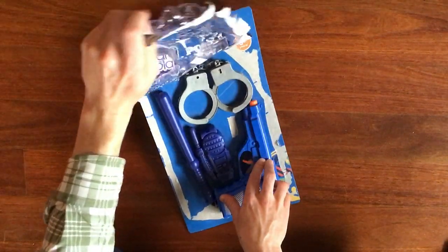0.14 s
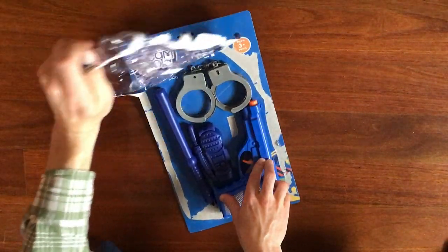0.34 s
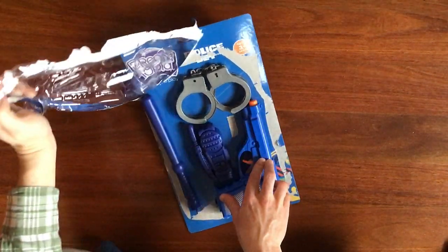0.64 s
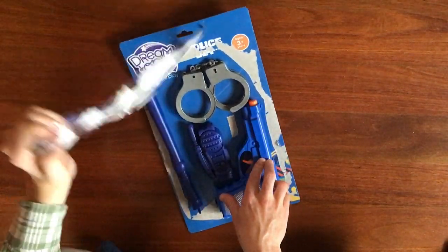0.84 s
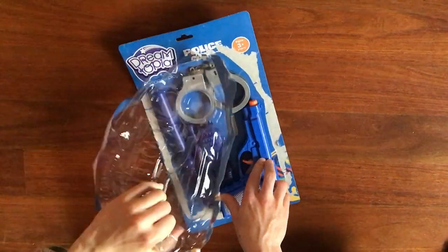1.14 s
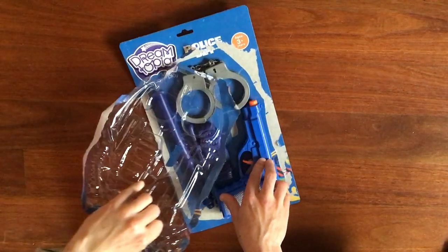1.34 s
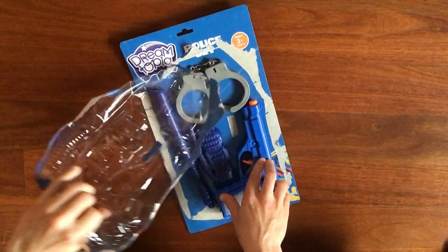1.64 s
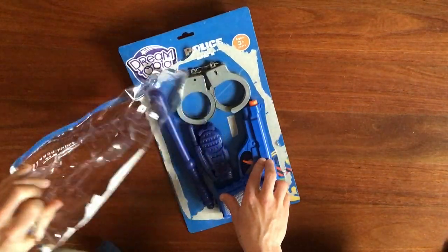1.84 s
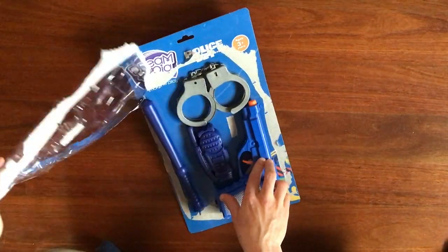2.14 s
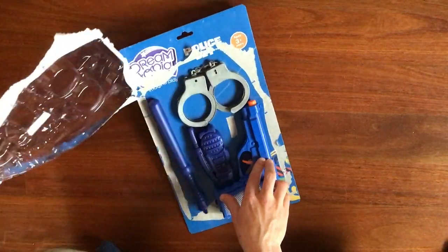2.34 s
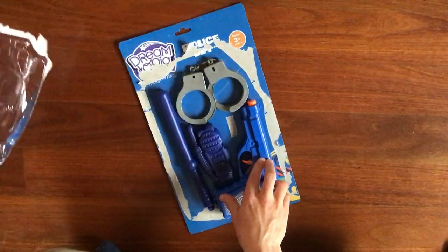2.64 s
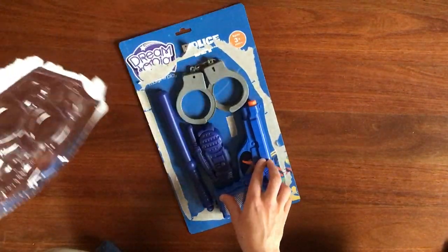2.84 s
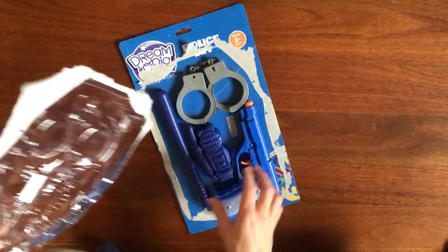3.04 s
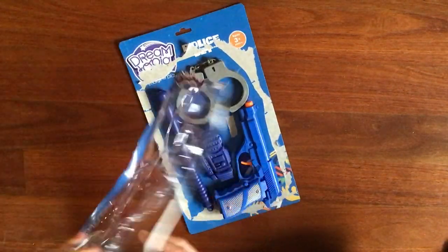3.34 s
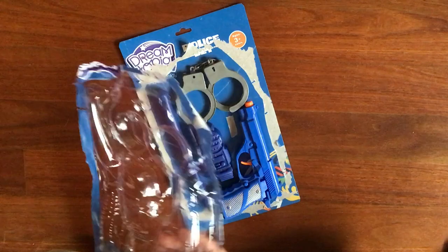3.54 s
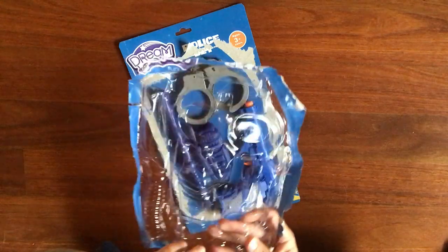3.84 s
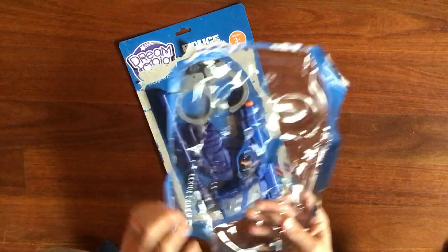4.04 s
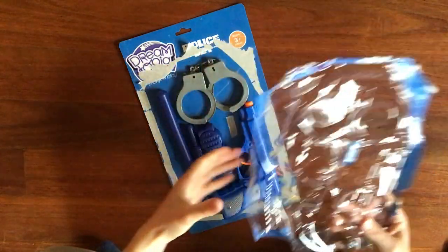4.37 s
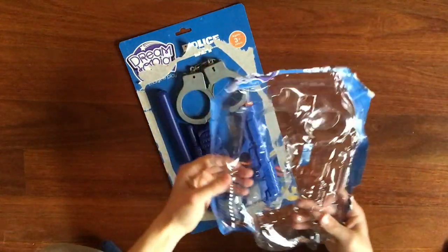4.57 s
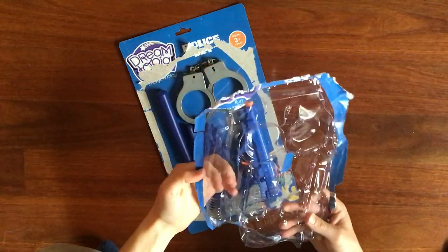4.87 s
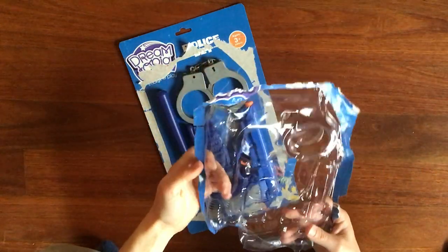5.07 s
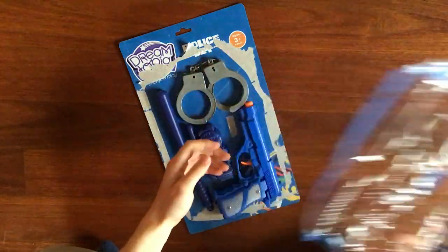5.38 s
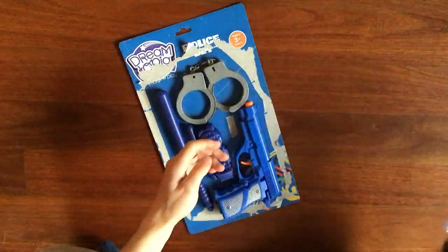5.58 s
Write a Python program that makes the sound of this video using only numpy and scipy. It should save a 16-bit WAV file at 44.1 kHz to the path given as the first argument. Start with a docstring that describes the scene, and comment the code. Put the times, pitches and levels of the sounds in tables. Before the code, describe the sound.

Stiff clear plastic packaging is torn from cardboard and turned in the hands, with sharp irregular snaps and crackling in a small room.

```python
"""A stiff clear plastic shell is torn off its cardboard backing on a wooden floor, then turned over in the hands.
Its dents buckle with sharp snaps, glued paper fibres tear in between; a small room answers, loud snaps overload the microphone."""
import sys
import numpy as np
from scipy import signal
from scipy.fft import rfft, irfft
from scipy.io import wavfile

SR = 44100
rng = np.random.default_rng(int(sys.argv[2]) if len(sys.argv) > 2 else 0)


def store_pcm(level_fs):
    """Save levels as 16-bit WAV."""
    pcm = np.round(np.clip(level_fs, -1, 1) * 32767).astype(np.int16)
    wavfile.write(sys.argv[1], SR, np.atleast_2d(pcm).T)


N = 251811

# buckling snaps: (s, snap dB, panel pitch Hz, half width in octaves, shell boom dB, bright crack dB)
SNAPS = [(.0043, -6, 4050, 0.61, -26, -24), (.0762, -20, 3100, 0.97, -25, -35), (.1508, -29.5, 3070, 0.59, -34.5, -37.5), (.2012, -28, 4100, 0.46, -49, -43),
         (.2335, -36.5, 2100, 1.2, -30.5, -58), (.3939, -28.5, 3030, 1.3, -34.5, -57), (.4207, -28, 3800, 1.4, -44.5, -55), (.4663, -23, 1760, 0.85, -24.5, -45),
         (.5443, -11.5, 4100, 0.34, -25.5, -16), (.6462, -13, 4700, 0.44, -30.5, -29), (.7025, -18.5, 2870, 0.92, -30, -53.5), (.7315, -12.5, 5600, 0.5, -55, -27),
         (.7866, -18.5, 3380, 0.68, -31, -43), (.821, -13, 3480, 1.13, -56.5, -30), (.8407, -10, 5100, 0.47, -24, -25), (.862, -18, 1680, 0.44, -38.5, -28),
         (.9128, -16.5, 2480, 2, -33, -41), (.9805, -8, 2420, 0.73, -31.5, -30), (1.0862, -7.5, 2630, 1, -18, -21), (1.1171, -15.5, 3420, 0.88, -35.5, -26.5),
         (1.1862, -18.5, 2220, 0.79, -30.5, -50), (1.2067, -5, 4000, 0.87, -14, -22), (1.2623, -7, 4070, 1.27, -15, -15),
         (1.2872, -19, 2780, 1.2, -19.5, -26), (1.3103, -8.5, 4500, 0.4, -32.5, -20), (1.321, -2, 2620, 1.38, -13.5, -21), (1.3323, -13, 2470, 2.9, -29.5, -32),
         (1.5792, -18, 1950, 0.54, -22, -76.5), (1.697, -13, 2350, 1.06, -22.5, -43), (1.7069, -15.5, 1940, 0.48, -38.5, -46.5),
         (1.7188, -17, 4200, .8, -40.5, -28), (1.7549, -16.5, 3880, 0.93, -31, -42), (1.785, -13, 2560, 1.4, -23, -27.5), (1.8068, -16.5, 2010, 0.84, -32, -34), (1.8421, -14, 4200, 0.88, -25.5, -30),
         (1.8627, -5, 3300, 1.14, -20.5, -19), (1.8727, -10.5, 3740, 0.98, -25.5, -41), (1.9223, -10, 2900, 1.1, -28, -45), (1.9521, -13.5, 2730, 0.54, -66, -68),
         (2.0332, -20, 4430, 1.1, -58.5, -47), (2.0452, -14.5, 3400, 0.74, -35.5, -24), (2.0855, -17.5, 3570, 0.85, -24, -47),
         (2.1749, -8, 3480, 0.87, -22, -37), (2.2627, -15.5, 3030, 0.49, -30.5, -34), (2.3347, -15, 2950, 1.4, -55.5, -30), (2.468, -24.5, 2500, 0.79, -31.5, -28),
         (2.4836, -9.5, 3020, 0.9, -26, -35), (2.5223, -16.5, 2630, 0.59, -30.5, -25.5), (2.7704, -23.5, 3830, 0.74, -44, -55), (2.7796, -12.5, 3940, 0.86, -30, -20.5),
         (2.9042, -37, 2340, 0.41, -46, -65), (3.0208, -20, 2040, 0.45, -35, -50), (3.0825, -34, 2280, 0.85, -35, -58), (3.1081, -13, 2920, 1.01, -57, -32.5),
         (3.1974, -25, 3650, 1, -43, -27.5), (3.2561, -32, 2330, 0.35, -40.5, -62), (3.3761, -21.5, 3280, 0.91, -43, -39.5), (3.4297, -27.5, 2220, 1.3, -33, -40.5),
         (3.4361, -16, 2750, 1.3, -27.5, -32), (3.4427, -11, 2680, 0.84, -39, -19), (3.4488, -12.5, 3100, 1.2, -22, -44.5), (3.4743, -12.5, 3070, 0.98, -24, -28),
         (3.4817, -22, 4460, 1.4, -46, -20), (3.4905, -12, 2750, 1.1, -43, -24), (3.495, -10, 2950, 1.3, -25.5, -34), (3.5618, -20, 3340, 1.2, -38.5, -37), (3.5683, -13.5, 3040, 1.1, -27, -20), (3.6872, -12, 3730, 1, -29.5, -18),
         (3.7319, -8, 3400, 1.16, -26.5, -19), (3.8313, -22.5, 3040, 1.3, -34, -47), (3.8411, -12, 5100, 0.59, -51, -23), (3.856, -24, 1900, 0.76, -47, -55), (3.8825, -15.5, 2240, 0.97, -31, -30),
         (3.9413, -22.5, 2220, 0.91, -28, -47), (4.029, -27, 3800, 0.31, -35.5, -67), (4.0556, -17, 3270, 1.33, -22.5, -21.5), (4.0984, -25.5, 3650, 1.4, -31.5, -54),
         (4.1314, -21, 2380, 1.7, -31.5, -52), (4.1463, -22, 3730, 0.98, -38.5, -34), (4.2571, -21, 2380, 0.83, -32.5, -51), (4.4133, -8.5, 2780, 1.32, -25.5, -20),
         (4.5424, -24, 2140, 1.1, -25.5, -44), (4.55, -15.5, 2800, 0.64, -31, -29), (4.5709, -13.5, 3100, 1.08, -26, -28),
         (4.6243, -22.5, 3200, 0.38, -41.5, -37), (4.6402, -5.5, 2500, 1.07, -21.5, -17), (4.7167, -10, 2460, 1.16, -37, -25), (4.721, -11.5, 2980, 0.8, -18, -19.5),
         (4.7375, -8.5, 3200, 0.74, -25, -18), (4.7701, -11.5, 2640, 1.03, -24.5, -35.5), (4.7785, -12, 3620, 1.4, -40.5, -21), (4.8006, -6.5, 3340, 1.15, -46.5, -12),
         (4.8812, -5, 2480, 0.68, -17, -17), (4.9444, -14, 3560, 1.06, -30.5, -28), (4.9739, -12.5, 2160, 1.14, -38, -29),
         (5.0553, -29, 2290, 1.4, -27.5, -59), (5.0883, -18.5, 4180, 0.51, -34, -28), (5.106, -8, 3400, 1.23, -22, -17), (5.2722, -30.5, 1470, 0.34, -59, -71),
         (5.2936, -21, 2730, 0.46, -29, -58), (5.4205, -31, 2530, 0.33, -43, -76)]
# tearing and flexing: (s, crackle dB, creak dB of the deep modes, of the middle modes, of the upper modes)
STRAIN = [(0.0, -17, -55.5, -37, -48.5), (0.219, -53.5, -64, -48, -62), (0.55, -25, -33, -49, -39), (.71, -46, -69, -47.5, -56), (.92, -36.5, -58.5, -52, -53.5), (1.21, -49.5, -37.5, -33, -43.5),
          (1.28, -18, -47.5, -45, -37), (1.42, -41.5, -53.5, -46, -56.5), (1.64, -59, -59, -38, -50.5), (1.84, -33, -31.5, -44, -41), (2.0, -39, -57.5, -67, -54), (2.19, -30.5, -41.5, -44, -43), (2.4, -34, -48, -41, -42),
          (2.7, -64, -59.5, -48, -68), (3.3, -74.5, -81, -61.5, -70), (3.45, -31.5, -35.5, -57, -64), (3.62, -41.5, -51.5, -62, -45), (4.011, -40, -41.5, -57, -50), (4.2, -61, -45.5, -73, -67.5), (4.4, -54, -87, -60, -74.5),
          (4.63, -51, -44, -27, -43), (4.76, -32, -36.5, -42, -38.5), (4.96, -44.5, -37, -24, -37.5), (5.15, -53, -62.5, -46.5, -45), (5.31, -78, -68.5, -36.5, -81.5), (5.71, -75, -64, -72, -73)]
RASP_DB = -6   # low rasp beside the deep creak
# bright fizz of the glue line peeling off the card: (s, dB)
PEEL = [(0., -46), (.3, -59), (.52, -43.5), (.75, -48), (1.3, -45.5), (1.55, -72), (1.75, -46), (2.14, -62.5), (2.28, -42.5), (2.48, -44), (2.62, -84)]
# held free in the air, the shell hums on in its second mode: (s, dB)
HOLLOW = [(3.4, -87), (3.5, -44), (4.17, -44.5), (4.32, -80)]
SHELL = [(205, -7, 0.075), (268.4, -8, 0.15), (320, -5.5, 0.12), (372, -4.5, 0.15), (643, -8.5, 0.11), (1128, -1, 0.056), (1226, -1.5, 0.069), (1446, -3.5, 0.11)]   # whole-shell modes: (Hz, dB, t60 s)
FIBRES = [(400, -33.5), (900, 12.5), (2000, 16), (5500, 15), (8000, 8.5), (16000, -6.5)]   # crackle colour: (Hz, dB per Hz)
HUSH, HUSH_DB = [(35, -46.5), (85, -15), (193, 4.5), (780, -5.5), (2410, -11), (16000, -33)], -55   # room tone: (Hz, dB per Hz)
ROOM_T60 = [(200, 0.33), (3000, 0.27), (7000, 0.26), (15000, 0.33)]   # (Hz, s)
ECHOES = [(.0038, -25)]   # off the floor: (delay s, dB)
CUTOFF_HZ = 16500   # fixed
SNAP_T60_S, CRACK_T60_S, THUD_T60_S = 0.011, 0.0097, 0.038
# thin creases ticking, all crack and no body: (s, dB)
TICKS = [(.9086, -25), (0.966, -28), (1.0394, -25), (1.0976, -21), (1.137, -16.5), (1.7966, -29),
         (1.943, -13.5), (2.417, -43), (2.668, -48), (3.5396, -21), (3.578, -26), (3.6546, -25)]
# the panel rings on at its pitch, less so the wider the snap
PANEL_DB, PANEL_LOSS_DB_PER_OCTAVE, PANEL_T60_S = 5, 5.5, 0.0068
# dull knocks of the card and the flexing shell: (s, peak dB, pitch Hz)
KNOCKS = [(0.375, -28.5, 293), (0.491, -23, 287), (1.087, -20.5, 314), (1.209, -9, 300), (1.582, -23.5, 264), (1.696, -25.5, 254),
          (1.863, -13, 394), (2.063, -19.5, 350), (2.18, -16.5, 257), (3.452, -16, 280), (3.688, -20.5, 360),
          (3.73, -18.5, 370), (3.883, -16, 372), (4.049, -20, 377), (4.412, -20.5, 365)]
KNOCK_T60_S, KNOCK_RISE_S = 0.063, 0.00063
# a dent flips in a sharp spike, flips once more a moment later, and leaves a weaker rattle
FLIP_T60_S, REFLIP_S, REFLIP_DB, RATTLE_DB = 0.0022, (0.002, 0.0042), -1, -3.5
AFTERSHOCKS = 8   # fixed
AFTER_DB, AFTER_T60_S = -6.5, 0.059   # smaller creases follow each flip, ever weaker
# small flat panels that ring on clearly after a snap: (s, peak dB, pitch Hz, t60 s)
PINGS = [(0.6465, -3, 5000, 0.014), (0.7307, -3, 3920, 0.015), (.9805, -10.5, 2250, 0.035), (3.1089, -9, 2920, 0.026), (3.842, -15.5, 3310, .05), (3.8825, -9, 1540, 0.027), (4.148, -25, 3480, .09), (4.8001, -7.5, 1830, 0.037)]
SLOWER_PER_DB = 0.38   # weak buckles give way gradually: rise time grows by this many dB for each dB under the strongest
MODE_SCATTER_DB = 4   # fixed


def amp(db):
    return 10 ** (np.asarray(db) / 20)


def rms_one(x):
    return x / np.sqrt(np.mean(x ** 2) + 1e-20)


def at_hz(points, hz):
    """A spectrum read on a log-frequency axis."""
    return np.interp(np.log(hz + 1), np.log(np.array(points)[:, 0]), np.array(points)[:, 1])


def curve(rows):
    """Gain over time from (s, dB) points."""
    return amp(np.interp(np.arange(N) / SR, *np.transpose(rows)))


def coloured(x, points):
    """A signal given a spectrum; rms 1."""
    return rms_one(irfft(rfft(x) * amp(at_hz(points, np.fft.rfftfreq(len(x), 1 / SR))), len(x)))


def ring(x, hz, t60):
    """A unit click sets a sine of height 1 ringing."""
    r, w = amp(-60 / (t60 * SR)), 2 * np.pi * hz / SR
    return signal.lfilter([0, np.sin(w)], [1, -2 * r * np.cos(w), r * r], x + 1e-18)


def snaps(near_db=(0., 1.5), spread_db=(-5., -8.), lumps=0.46, boom_db=-7.5, thud_db=0.0, rise_s=0.00019, count=4):
    """Each buckle is a dry burst around its panel's pitch with a bright crack, and a push on the whole shell.
    Returns what is heard straight, what spreads into the room from each of a few spots on the sheet, and the boom."""
    size = 2048
    near, spread, push = np.zeros(N + size), np.zeros((count, N + size)), np.zeros((len(SHELL), N))
    t = np.arange(size) / SR
    for k, (s, snap_db, hz, octaves, boom, crack_db) in enumerate(SNAPS):
        rise = 1 - np.exp(-(t + 1 / SR) / (rise_s * amp(-SLOWER_PER_DB * snap_db)))   # a dent takes a moment to flip
        noise, shares, at = rng.standard_normal((3, size)) * rise, rng.normal(0, MODE_SCATTER_DB, len(SHELL)), round(s * SR)
        wide = 2 ** np.clip(octaves, .15, 1.6)   # fixed
        # summed over all directions a burst is partly smoothed to the colour of a plain click
        snap = amp(snap_db) * band([noise[0] * flips(t, SNAP_T60_S), t == 0], hz / wide, hz * wide)
        snap = snap + amp(snap_db + PANEL_DB - PANEL_LOSS_DB_PER_OCTAVE * octaves) * ring(1. * (t == 0), hz, PANEL_T60_S)
        crack = amp(crack_db) * band([noise[1] * flips(t, CRACK_T60_S), t == 0], 7300, 15500)
        thud = amp(boom + thud_db) * band(noise[2] * amp(-60 * t / THUD_T60_S), 444, 2200)   # the dent's first dull give
        near[at:at + size] += amp(near_db[0]) * snap[0] + amp(near_db[1]) * crack[0] + thud
        spread[k % count, at:at + size] += amp(spread_db) @ [snap[1] + lumps * snap[0], crack[1] + lumps * crack[0]] + thud
        push[:, at] += amp(boom + boom_db + shares) * np.sign(noise[0, 0])
    boom = sum(amp(db) * ring(p, hz, t60) for p, (hz, db, t60) in zip(push, SHELL))
    return near[:N], spread[:, :N], boom


def grains(per_s, size_db):
    """Random clicks of very uneven size."""
    sizes = amp(size_db * np.minimum(rng.exponential(1, N), 5)) * rng.choice([-1, 1], N)
    return sizes * (rng.random(N) < per_s / SR)


def tearing():
    """Fibres part and small creases tick in dense grains; the bent shell creaks in its modes, the card rasps low."""
    s, *columns = np.transpose(STRAIN)
    crackle, deep, middle, upper = (amp(np.interp(np.arange(N) / SR, s, c)) for c in columns)
    creak = sum(amp(db) * (deep if hz < 500 else middle if hz < 900 else upper) * rms_one(ring(grains(per_s=200., size_db=3.5), hz, t60))   # fixed
                for hz, db, t60 in SHELL)
    rasp = deep * amp(RASP_DB) * rms_one(band(grains(per_s=520.0, size_db=4.0), 190, 700))
    fizz = curve(PEEL) * rms_one(band(grains(per_s=1800., size_db=6.5), 8000, 16000))
    hollow = curve(HOLLOW) * rms_one(ring(grains(per_s=380.0, size_db=-1.0), SHELL[1][0], t60=0.55))
    return crackle * coloured(grains(per_s=3400.0, size_db=2.5), FIBRES) + fizz + creak + rasp + hollow


def room(x, build_s=0.0033):
    """The diffuse tail from one spot, dying band by band."""
    t = np.arange(SR // 2) / SR
    edges = 100 * 2 ** np.arange(0, 7.6, .5)   # fixed
    noise = rng.standard_normal((2, len(t)))
    tail = sum(signal.sosfilt(signal.butter(2, [lo, hi], "band", fs=SR, output="sos"), noise[k % 2])
               * amp(-60 * t / at_hz(ROOM_T60, np.sqrt(lo * hi))) for k, (lo, hi) in enumerate(zip(edges, edges[1:])))
    tail = tail * (1 - np.exp(-(t / build_s) ** 2))   # reflections thicken after the first few milliseconds
    return signal.fftconvolve(x, tail / np.sqrt(np.sum(tail ** 2)))[:N]


def echoes(x):
    """Direct sound with its echo off the floor."""
    out = x.copy()
    for delay, db in ECHOES:
        lag = round(delay * SR)
        out[lag:] += amp(db) * x[:-lag]
    return out


def band(x, lo, hi):
    """A band of a burst, at level 1 over its first 4 ms."""
    y = signal.sosfilt(signal.butter(2, [lo, hi], "band", fs=SR, output="sos"), x)
    return y / np.sqrt(np.mean(y[..., :SR // 250] ** 2, axis=-1, keepdims=True))


def ticks(t60=0.0024, low_hz=6000):
    """Very short bright clicks."""
    out, t = np.zeros(N), np.arange(512) / SR
    for s, db in TICKS:
        at = round(s * SR)
        out[at:at + len(t)] += amp(db) * band(rng.standard_normal(len(t)) * amp(-60 * t / t60), low_hz, 18000)
    return out


def knocks():
    """Soft pushes, each ringing briefly at its own low pitch."""
    out, t = np.zeros(N + SR), np.arange(SR // 5) / SR
    for s, db, hz in KNOCKS:
        at = round(s * SR)
        out[at:at + len(t)] += amp(db - 60 * t / KNOCK_T60_S) * (1 - np.exp(-t / KNOCK_RISE_S)) * np.sin(2 * np.pi * (hz * t + rng.random()))
    return out[:N]


def flips(t, t60):
    """Envelope of one buckle: spike, second spike, rattle, then neighbouring creases letting go."""
    late = t - rng.uniform(*REFLIP_S)
    after = t - rng.uniform(0, t[-1], (AFTERSHOCKS, 1))
    sizes_db = AFTER_DB - 60 * (t - after) / AFTER_T60_S + rng.normal(0, 3.1, (AFTERSHOCKS, 1))
    creases = np.sum((after > 0) * amp(sizes_db - 60 * np.abs(after) / FLIP_T60_S), axis=0)
    return creases + amp(-60 * t / FLIP_T60_S) + (late > 0) * amp(REFLIP_DB - 60 * np.abs(late) / FLIP_T60_S) + amp(RATTLE_DB - 60 * t / t60)


def pings():
    """Single clear panel modes, struck once."""
    out = np.zeros(N)
    for s, db, hz, t60 in PINGS:
        out += amp(db) * ring(1. * (np.arange(N) == round(s * SR)), hz, t60)
    return out


def scene():
    """Every spot on the sheet has its own path through the room."""
    near, spread, boom = snaps()
    sheet = boom + tearing() + ticks() + knocks() + pings()
    hush = amp(HUSH_DB) * coloured(rng.standard_normal(N), HUSH)
    return (echoes(near + sheet) + sum(room(spot) for spot in spread) + amp(-9.5) * room(sheet) + hush)[None]


def record(dry):
    """The microphone drops the bass, the loudest snaps clip, the top is cut."""
    x = signal.sosfilt(signal.butter(6, 184, "high", fs=SR, output="sos"), dry)
    x = np.clip(x, -1, 1)
    return signal.sosfilt(signal.cheby2(20, 70, CUTOFF_HZ, fs=SR, output="sos"), x)


dry = scene()
out = record(dry)
store_pcm(out)
```